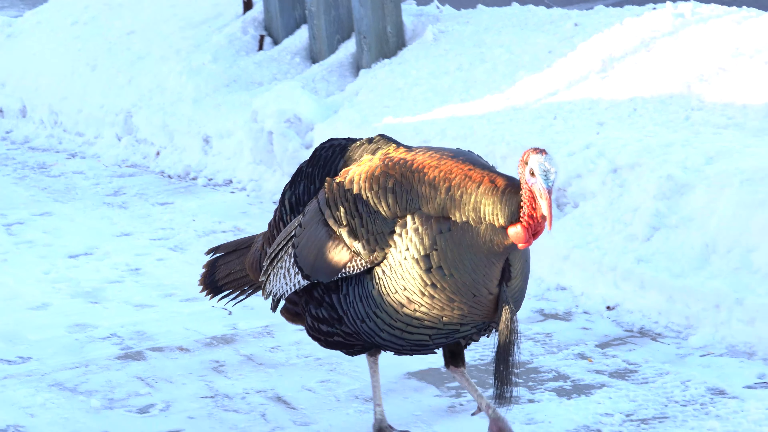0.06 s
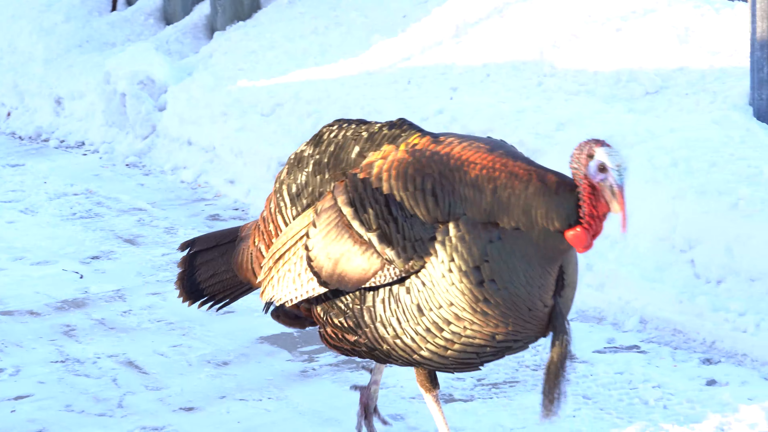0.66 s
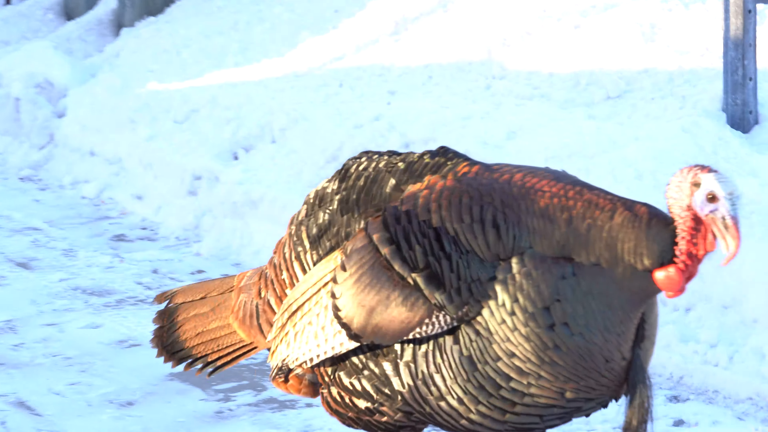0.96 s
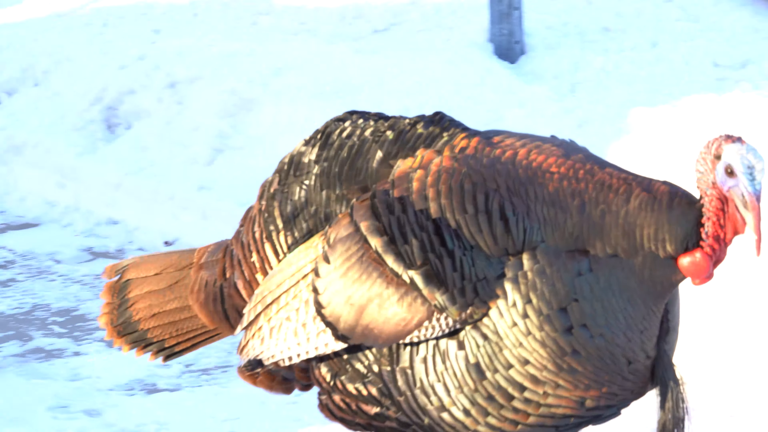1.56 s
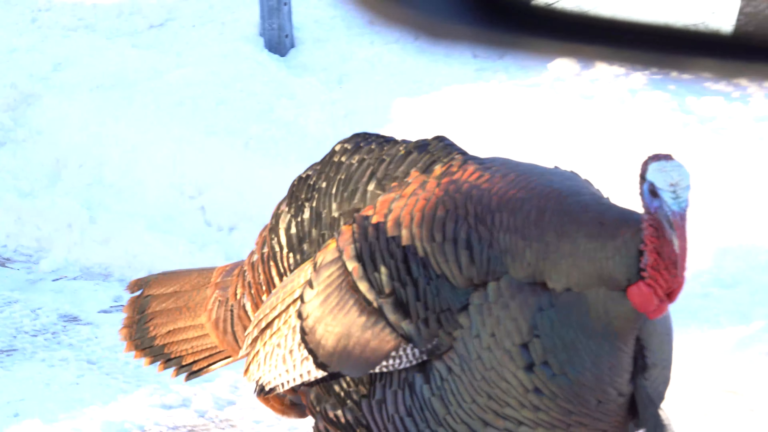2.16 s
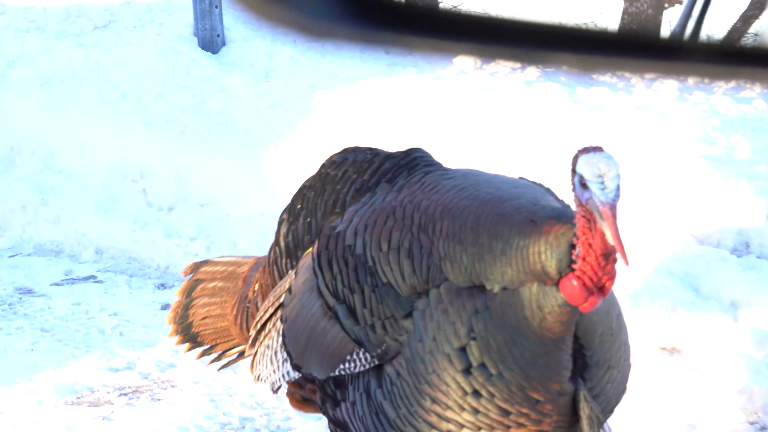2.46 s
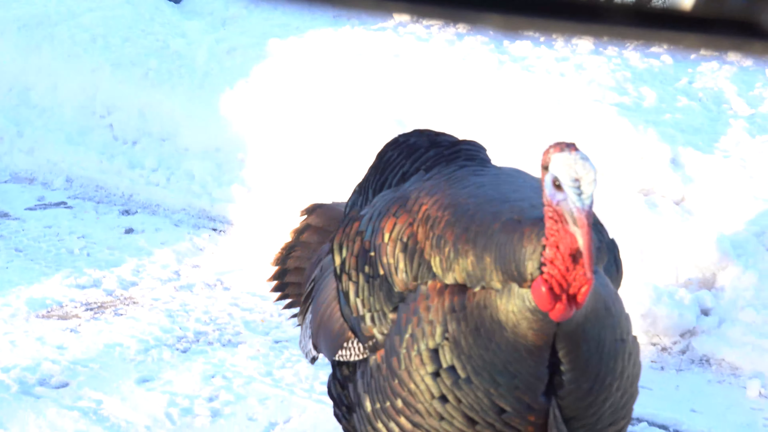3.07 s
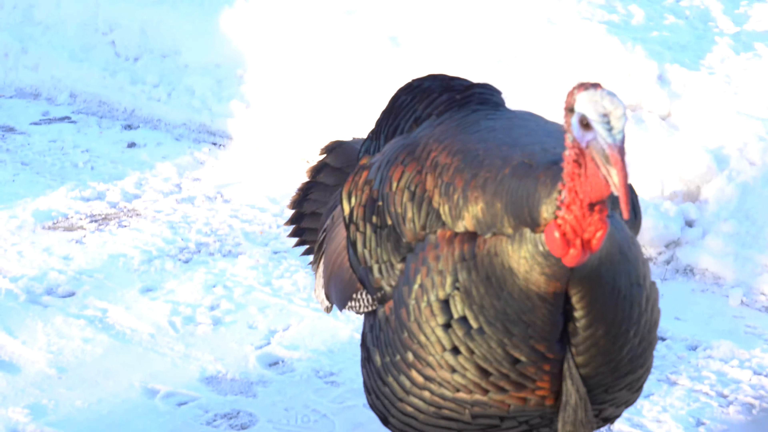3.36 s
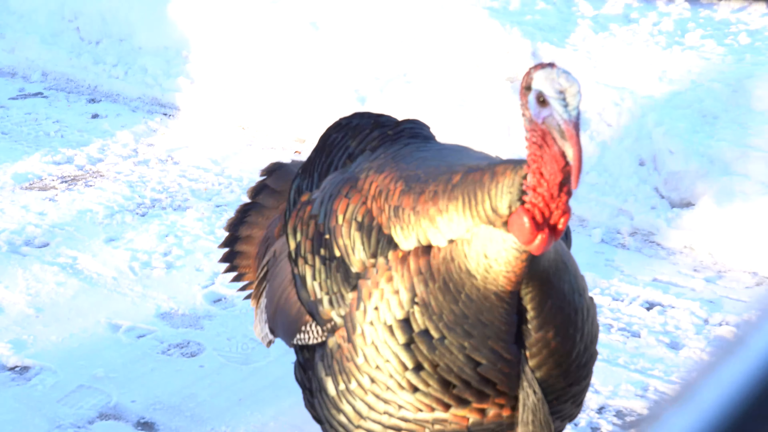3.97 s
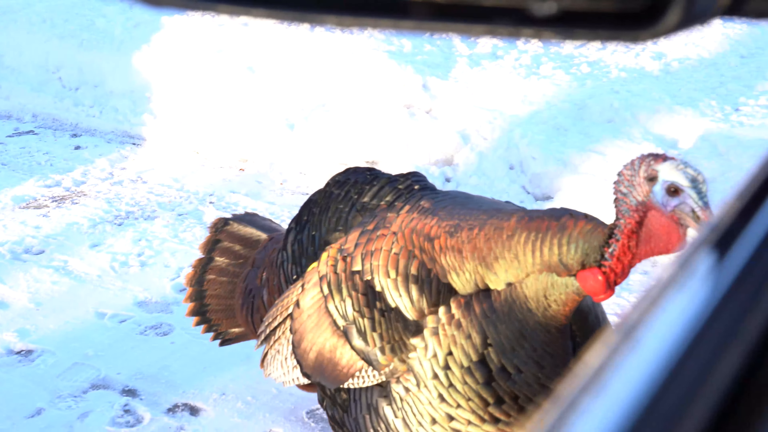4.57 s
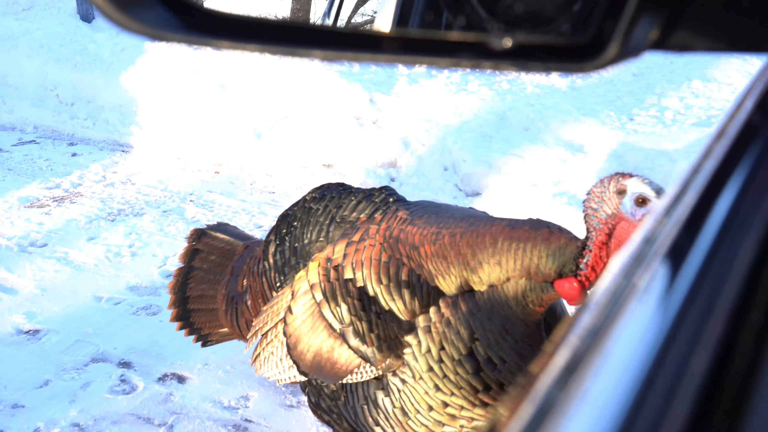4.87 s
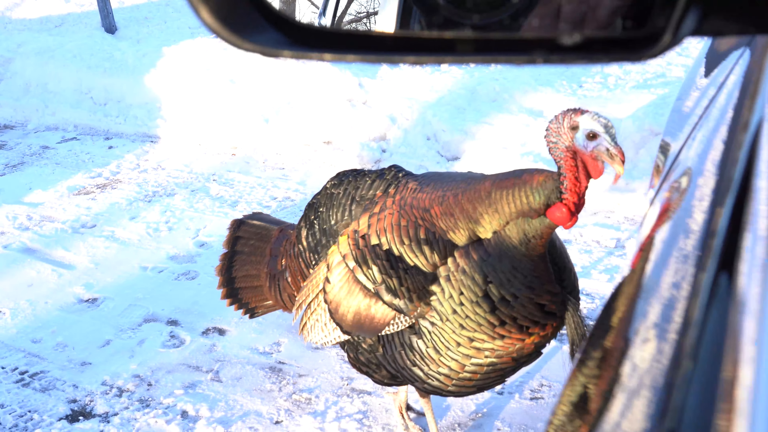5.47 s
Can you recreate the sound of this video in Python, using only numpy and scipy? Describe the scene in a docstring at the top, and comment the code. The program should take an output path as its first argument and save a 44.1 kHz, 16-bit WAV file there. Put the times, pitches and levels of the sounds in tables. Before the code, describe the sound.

A wild turkey calls close by outdoors, near the centre and slightly to the right, with hardly any echo. A brief scrap of gobble sounds right at the start. From about 0.6 to 1.1 seconds comes a faint, thin, quavering whine that ends in a small crack. Two rattling gobbles follow, at 1.4 to 1.8 and 2.3 to 2.8 seconds, each opening with quick yodelled notes and then flipping rapidly between rough barks and clear, higher tones. A second whine, from 3.2 to 3.7 seconds, arches, swells and breaks downward. The longest gobble runs from about 4.2 to 4.9 seconds. A few faint, dry ticks fall between 5.1 and 5.4 seconds, then a last gobble begins and is cut off around 5.6. Well beneath the bird throughout are a soft outdoor rush, a gently swelling hiss and a very faint low hum.

```python
"""A snowy drive, with a wild turkey close by: five rattling gobbles and two thin, quavering whines.
Most calls open with a few yodelled notes. In a gobble the bird's voice box (the syrinx) breaks about
23 times a second from a low bark up into a clear tone. A whine arches, swells and ends in a falling
crack. Windpipe, throat and mouth colour the voice, and snow banks scatter a little of it back.
Behind the bird are a soft outdoor rush, a swelling hiss, a low hum and faint ticks."""
import sys
import numpy as np
from scipy import signal
from scipy.fft import rfft, irfft, next_fast_len
from scipy.io import wavfile
from scipy.ndimage import uniform_filter1d, map_coordinates

SR = 44100
rng = np.random.default_rng(int(sys.argv[2]) if len(sys.argv) > 2 else 0)


def inscribe(sig):
    """Save sig as 16-bit PCM at rate SR to the path in sys.argv[1].

    A 1-D sig is mono; a 2-D sig holds one channel per row.
    Samples are clipped to [-1, 1] before scaling.
    """
    pcm = np.round(np.clip(np.atleast_2d(sig).T, -1, 1) * 32767)
    wavfile.write(sys.argv[1], SR, pcm.astype(np.int16))


N = 248283

# The tone colour of the rush. Each row: frequency in Hz, relative level in dB.
RUSH_COLOUR = [(15, -60), (25, -35), (38, -41), (69, -28), (107, -16), (145, -17.5), (210, -12.5),
               (370, -11), (480, -6.5), (791, 1), (1360, -4.5), (1590, -4.5), (2150, -12), (3870, -25),
               (4500, -33), (5850, -53), (9900, -120)]
# How alike left and right are in the rush. Each row: frequency in Hz, likeness from 0 to 1.
RUSH_LIKENESS = [(60, 0.99), (150, 1), (380, 0.92), (950, 0.55), (2380, 0.01), (5980, 0.01), (15000, 0.06)]
# The tone colour of the hiss. Each row: frequency in Hz, relative level in dB.
HISS_COLOUR = [(1470, -19), (2500, -2.5), (2740, -3.5), (3870, -3), (4870, -1.5), (10200, -5),
               (14700, -8.5), (15600, -9)]
# How the hiss swells and sinks. Each row: time in seconds, relative level in dB.
HISS_SWELL = [(0.02, -58.5), (0.32, -57.5), (0.55, -49.5), (0.69, -51.5), (0.78, -59), (1.41, -47.5),
              (1.97, -53), (2.47, -52.5), (2.62, -59.5), (3.01, -51), (3.48, -53), (3.7, -48), (4.07, -56),
              (4.92, -48.5), (5.01, -51.5), (5.43, -52.5), (5.57, -45), (5.62, -46.5)]
# The tones in the hum. Each row: frequency in Hz, relative level in dB.
HUM_TONES = [(48.4, -82), (107.7, -75), (124.7, -83), (171.6, -71.5), (215.3, -89)]
# How the hum grows louder late on. Each row: time in seconds, level change in dB.
HUM_SWELL = [(0, -1), (2.7, -1), (3.4, -2), (4.1, 3), (5.6, 1)]

# The syllables of the gobbles. Each row: time of the bark in seconds, relative levels in dB of the
# bark, the break and the clear tone, then the pitch of that tone in Hz.
GOBBLE_SYLLABLES = [(0.0296, -18, -23, -27, 1280), (0.078, -17, -29, -27, 1285),
                    (1.49, -14.5, -12.5, -22, 1350), (1.531, -13.5, -13, -15, 1367),
                    (1.5707, -12.5, -10, -9, 1368), (1.6133, -13, -11, -9.5, 1360),
                    (1.6567, -14, -20.5, -13.5, 1380), (1.6993, -14, -7.5, -18, 1393),
                    (1.7424, -12.5, -5, -15, 1350), (1.788, -14.5, -13.5, -20.5, 1385),
                    (2.3929, -11, -27, -11.5, 1296), (2.4375, -9, -24, -22, 1426),
                    (2.479, -7.5, -18, -20.5, 1480), (2.5231, -10, -15, -23.5, 1440),
                    (2.5639, -9.5, -17, -21, 1510), (2.607, -11.5, -12.5, -21, 1457),
                    (2.6491, -11.5, -15.5, -19, 1497), (2.6919, -10.5, -14, -17.5, 1444),
                    (2.7371, -8.5, -13.5, -17, 1460), (2.7811, -10.5, -18, -16, 1457),
                    (4.2643, -10, -22, -21, 1330), (4.307, -12, -18.5, -17.5, 1420),
                    (4.3477, -10, -18.5, -14.5, 1400), (4.3898, -10, -17.5, -19, 1405),
                    (4.4316, -12.5, -19, -18, 1386), (4.4741, -12, -23, -20.5, 1417),
                    (4.517, -9.5, -22, -18.5, 1400), (4.5606, -13, -25, -23, 1383),
                    (4.604, -10, -27, -20, 1410), (4.6483, -10.5, -20.5, -17, 1434),
                    (4.6938, -10.5, -21, -17.5, 1436), (4.739, -9.5, -20, -16.5, 1436),
                    (4.783, -10, -23, -16, 1440), (4.8306, -11, -28, -20.5, 1320),
                    (5.4675, -9, -29, -11, 1320), (5.5125, -9.5, -9.5, -17.5, 1350),
                    (5.5593, -10.5, -21, -17, 1386), (5.6, -9, -15, -17.5, 1383)]
# How throat and beak are set in a gobble. Each row: time in seconds, throat resonance in Hz, relative
# levels in dB of the mouth and the beak ring, pitch of the ring in Hz, its waver in radians.
THROAT_SETTINGS = [(0.05, 1280, -12.5, -22, 3505, 0.49), (1.5, 1446, -7, -28, 3760, .4),
                   (1.79, 1300, -16.5, -25, 3560, 0.39), (2.39, 1373, -10.5, -36, 3880, .9),
                   (2.56, 1340, -12, -27, 3720, 0.61), (2.78, 1240, -15.5, -27, 3460, 0.48),
                   (4.26, 1170, -14, -43, 3760, .8), (4.47, 1113, -20.5, -36.5, 3620, 1.4),
                   (4.6, 1140, -27, -29.5, 3290, 1.5), (4.83, 1140, -21.5, -28.5, 2950, 1.2),
                   (5.47, 1270, -19, -39, 3300, 1.2), (5.6, 1256, -19, -36, 3900, 1.1)]
# The yodelled notes that open a call. Each row: start and length in seconds, start and end of the
# glide in Hz (before it is bent), relative level in dB, mouth resonance in dB.
YODEL_NOTES = [(0.598, 0.02, 1354, 1330, -38.5, -18), (0.613, 0.042, 980, 1005, -31.5, -9.5),
               (1.385, 0.024, 970, 1077, -27.5, -6), (1.415, 0.03, 1166, 792, -30.5, -10),
               (1.449, 0.013, 1310, 1320, -27.5, -18), (2.287, .023, 1203, 930, -24.5, -23),
               (2.311, 0.029, 1148, 930, -27, -25), (2.345, 0.0078, 1120, 1480, -21, -18),
               (2.357, 0.017, 1510, 1220, -32.5, -18), (3.175, 0.015, 1380, 1480, -36.5, -13),
               (3.195, 0.013, 1435, 1226, -27.5, 3.5), (3.208, 0.013, 996, 862, -25.5, 3.5),
               (3.224, .015, 980, 1100, -31.5, -10), (4.154, 0.025, 1032, 1074, -22.5, -17.5),
               (4.177, 0.014, 1440, 1305, -19, -24), (4.193, 0.03, 997, 830, -26.5, -8),
               (4.22, 0.0192, 1340, 1450, -20, -22), (5.388, 0.014, 1270, 1123, -24, -21),
               (5.403, 0.014, 1084, 905, -19, -15), (5.419, 0.008, 1180, 1450, -13.5, -30),
               (5.423, 0.017, 1440, 1310, -31, -18)]
# Held stretches of whining. Each row: start and length in seconds, top of the arch in Hz, final sag as
# a share of the pitch, relative level at start and end in dB, mouth resonance at start and end in dB,
# high overtones in dB, jitter as a share of the pitch, throb depth in dB, quaver delay in seconds.
WHINE_STRETCHES = [(0.727, 0.13, 1007, .025, -35, -33, -15.5, -13, -22, 0.026, 3, 0.00036),
                   (0.864, .192, 1032, 0.078, -31, -27.5, -14.5, -8.5, -22.5, .018, 2.5, 0.0117),
                   (1.047, 0.06, 922, 0.092, -28, -25, -1, 5, -35, 0.0063, 0.5, 0.0027),
                   (3.317, 0.3546, 1032, .115, -31.5, -16.5, -13, 1.5, -42, 0.0085, 3.5, .022)]
# The cracks that end the whines. Each row: start and length in seconds, start and end pitch in Hz,
# relative level in dB, mouth resonance in dB.
VOICE_CRACKS = [(1.107, 0.029, 822, 716, -28, -3.5), (3.671, .037, 862, 340, -17.5, -24)]
# The tone colour of the rasp of air in the calls. Each row: frequency in Hz, relative level in dB.
BREATH_COLOUR = [(300, -77), (700, 15.5), (2000, 7.5), (3000, -13), (4200, -11.5), (5000, -11.5),
                 (8000, -13), (15000, -42)]
# A small open beak gives out almost no bass. Each row: frequency in Hz, level change in dB.
BEAK_BASS_CUT = [(200, -32), (340, -13), (455, -0.5)]
# Where the head points. Each row: time in seconds, left level minus right level in dB, head start of
# the left side in microseconds (below zero, the right side is first).
HEAD_DIRECTION = [(0, -2, -57), (.9, -2, -103), (1.65, -0.4, -64), (2.6, -1.5, -45), (3.5, 1.5, -52),
                  (4.3, -1.5, -67), (4.7, 0.4, -78), (5.5, -1.3, -78)]

# The faint ticks. Each row: start in seconds, relative level in dB.
TICK_EVENTS = [(2.0624, -42), (5.1455, -19.5), (5.2106, -25), (5.306, -23.5), (5.3805, -20.5)]
# The tone colour of the ticks. Each row: frequency in Hz, level change in dB.
TICK_COLOUR = [(800, -6), (3000, 5), (15000, -11)]


def amp(db):
    """Turn decibels into a number to multiply a sound by."""
    return 10 ** (np.asarray(db) / 20)


def unit(x):
    """Scale a sound to an average (rms) strength of 1."""
    return x / np.sqrt(np.mean(x ** 2) + 1e-20)


def along(points, hz):
    """Read between (Hz, value) points, with the octaves evenly spaced."""
    freqs, values = np.transpose(points)
    return np.interp(np.log(hz + 1), np.log(freqs + 1), values)


def curves(rows, t):
    """Read each column after the first (the time) at the times t."""
    times, *columns = np.transpose(rows)
    return [np.interp(t, np.sort(times), column) for column in columns]


def span(start, end):
    """The time of each sample from start to end, in seconds."""
    return np.arange(max(0, round(start * SR)), round(end * SR)) / SR


def wobble(t, rate):
    """A smooth curve through `rate` random values a second."""
    steps = (t - t[0]) * rate
    return map_coordinates(rng.standard_normal(int(steps[-1]) + 4), [steps + 1], mode="nearest")


def fade(t, in_s, out_s):
    """Fade in smoothly, hold, then fade out."""
    ramp = np.minimum((t - t[0]) / in_s, (t[-1] - t) / out_s)
    return np.sin(np.pi / 2 * np.clip(ramp, 0, 1)) ** 2


def add(track, t, sound):
    """Mix a sound into the track, starting at the first time in t."""
    part = track[round(t[0] * SR):][:len(sound)]
    part += sound[:len(part)]


def filtered(x, response):
    """Multiply each frequency in x by response(hz)."""
    size = next_fast_len(N + 8192)
    return irfft(rfft(x, size) * response(np.fft.rfftfreq(size, 1 / SR)), size)[..., :N]


def coloured(x, colour):
    """Turn frequencies up or down by a table of (Hz, dB) points."""
    return filtered(x, lambda hz: amp(along(colour, hz)))


def rush(t, level_db=-40.5):
    """A soft, distant rush: left and right share the bass but differ in the treble."""
    def response(hz):
        spread = np.arccos(along(RUSH_LIKENESS, hz)) / 2
        return amp(along(RUSH_COLOUR, hz)) * [np.cos(spread), np.sin(spread)]

    mid, side = filtered(rng.standard_normal((2, N)), response)
    return unit(np.array([mid + side, mid - side])) * amp(level_db + 1.1 * wobble(t, rate=14))


def hiss(t, shared_power=0.057, boost_db=4):
    """A wide hiss that swells and sinks, a touch louder on the left."""
    white = rng.standard_normal((2, N)) + np.sqrt(shared_power) * rng.standard_normal(N)
    noise = unit(coloured(white, HISS_COLOUR)) * amp([[0.3], [-0.3]])
    return noise * amp(curves(HISS_SWELL, t)[0] + boost_db + 1.08 * wobble(t, rate=46))


def hum(t):
    """A few low tones, each drifting in level and pitch."""
    tones = np.zeros(N)
    for hz, db in HUM_TONES:
        level = np.sqrt(2) * amp(db + 4.5 * wobble(t, rate=3.3))
        tones += level * np.sin(2 * np.pi * hz * t + 0.28 * wobble(t, rate=2.85))
    return tones * amp(curves(HUM_SWELL, t)[0])


def peak(x, centre, width):
    """A steep-sided bump of height 1."""
    return 1 / (1 + ((x - centre) / width) ** 2) ** 2


def airway(hz, throat_hz, mouth_db, top_db, top_hz):
    """The airway favours four bands (resonances): windpipe, throat, mouth and a high one on top."""
    windpipe = amp(-6.5) * peak(hz, centre=739, width=223)
    throat = peak(hz, throat_hz, width=342)
    mouth = amp(mouth_db) * peak(hz, centre=2055, width=304)
    top = amp(top_db) * peak(hz, top_hz, width=440)
    return np.sqrt(windpipe ** 2 + throat ** 2 + mouth ** 2 + top ** 2)


def voice(pitch, throat_hz, mouth_db, top_db, odd=1, top_hz=3600):
    """Ten harmonics of the syrinx pass through the airway; without the odd ones it is an octave up."""
    harmonic = np.arange(1, 11)[:, None]
    hz = harmonic * pitch
    phase = 2 * np.pi * (np.cumsum(pitch) / SR + rng.random())
    gain = airway(hz, throat_hz, mouth_db, top_db, top_hz) * np.where(harmonic % 2, odd, 1)
    lag = np.arctan((hz - throat_hz) / 350)  # the throat rings after each pulse
    strength = np.sqrt(np.sum(gain ** 2, axis=0) / 2)
    return np.sum(gain * np.sin(harmonic * phase - lag), axis=0) / strength


def gobble_syllable(at, bark_db, break_db, tone_db, tone_hz, bark_hz=599, shimmer_db=2):
    """The pitch slides down into a rough bark; rising again, the syrinx flips up an octave, clear."""
    gaps = [at - start - length for start, length, *_ in YODEL_NOTES if start < at]
    since_yodel = min(gaps, default=np.inf)
    # just after a yodel the bark is longer and the slide between barks is louder
    hold_s = 0.0012 + 0.021 * np.exp(-since_yodel / 0.022)
    slide_db = -42.5 + 20 * np.exp(-since_yodel / 0.086)
    throat_hz, mouth_db, beak_db, beak_hz, beak_waver = curves(THROAT_SETTINGS, at)
    bark_start, bark_end = at - hold_s / 2, at + hold_s / 2
    half_hz = tone_hz / 2  # heard as tone_hz once the odd harmonics drop out
    # Each row: time in seconds, pitch in Hz, level in dB, odd harmonics and roughness from 0 to 1.
    shape = [(bark_start - 0.023, 1060, slide_db - 22, 1, 0.1),
             (bark_start - 0.018, 970, slide_db, 1, 0.1),
             (bark_start - 0.011, 800, slide_db, 1, 0.3),
             (bark_start - 0.0055, bark_hz * 1.05, bark_db - 14, 1, 0.8),
             (bark_start, bark_hz * 0.8073, bark_db - 4.5, 1, 1),
             (bark_end + 0.0023, bark_hz * 1.154, bark_db - 3, 0.8, 1),
             (bark_end + 0.0036, half_hz, break_db, 0.2, 0.3),
             (bark_end + 0.0083, half_hz, tone_db, 0.02, 0.1),
             (bark_end + 0.01705, half_hz * 0.969, tone_db - 11.5, 0.02, 0.1),
             (bark_end + 0.021, half_hz * 0.85, slide_db - 4.5, 0.02, 0.1),
             (bark_end + 0.04, half_hz * 0.85, slide_db - 6, 0.02, 0.1)]
    t = span(shape[0][0], shape[-1][0])
    pitch, db, odd, rough = uniform_filter1d(np.array(curves(shape, t)), size=70, axis=1)
    pitch = pitch * np.exp(0.05 * rough * wobble(t, rate=700))
    tone = voice(pitch, throat_hz, mouth_db + 9 * rough - 11, beak_db + 10 * rough - 11, odd, beak_hz)
    # the sharpest pulses of the bark set off a short, high ring in the beak
    waver = beak_waver * wobble(t, rate=1300)
    ring = np.sin(2 * np.pi * beak_hz * t + waver) * peak(t, centre=at + 0.003, width=0.0053)
    level = amp(db + shimmer_db * rough * np.tanh(wobble(t, rate=564)))
    return t, level * tone + amp(bark_db + beak_db + 5.5) * ring


def yodel(start, length, start_hz, end_hz, level_db, mouth_db, flip_hz=1125, overlap_s=0.0036):
    """A short, clear glide. Both ends bend towards the pitch where the voice flips register."""
    t = span(start - overlap_s, start + length + overlap_s)
    glide = np.geomspace(start_hz, end_hz, len(t))
    bend = 0.37 * np.linspace(-1, 1, len(t)) ** 4
    pitch = (glide + bend * (flip_hz - glide)) * np.exp(0.004 * wobble(t, rate=430))
    level = amp(level_db + 2.4 * wobble(t, rate=227)) * fade(t, in_s=0.01, out_s=0.0085)
    return t, level * voice(pitch, throat_hz=1110, mouth_db=mouth_db, top_db=-45)


def whine(start, length, crest_hz, sag, start_db, end_db, start_mouth_db, end_mouth_db, top_db,
          jitter, throb_db, quaver_lag, quaver_hz=41.15, crest_at=0.4, calm_s=0.033):
    """A held note that arches and swells, with a fast quaver that calms at the end."""
    t = span(start, start + length)
    progress = np.linspace(0, 1, len(t))
    climb_left = np.clip(1 - progress / crest_at, 0, 1)
    past_crest = np.clip((progress - crest_at) / (1 - crest_at), 0, 1)
    arch = 1 - 0.0331 * climb_left ** 2 - sag * past_crest ** 2.3
    beat = np.pi * quaver_hz * (t - start - quaver_lag)
    unrest = np.clip((t[-1] - t) / calm_s, 0, 1)
    quaver = 0.096 * unrest * (np.abs(np.cos(beat)) - 2 / np.pi)  # round tops, sharp dips
    pitch = crest_hz * arch * np.exp(quaver + jitter * wobble(t, rate=700))
    effort = progress ** 1.67  # the note swells late, and the mouth opens as it does
    throb = throb_db * unrest * np.cos(2 * beat + 1.93) + wobble(t, rate=56.4)
    db = start_db + (end_db - start_db) * effort + throb + 0.15 * wobble(t, rate=630)
    mouth_db = start_mouth_db + (end_mouth_db - start_mouth_db) * effort + throb
    tone = voice(pitch, throat_hz=1268, mouth_db=mouth_db, top_db=top_db, top_hz=3360)
    return t, amp(db) * fade(t, in_s=0.0031, out_s=0.008) * tone


def crack(start, length, start_hz, end_hz, level_db, mouth_db, jitter=0.044, rasp_db=3, overlap_s=0.003):
    """The voice gives way: it dives and turns rough."""
    t = span(start - overlap_s, start + length + overlap_s)
    pitch = np.geomspace(start_hz, end_hz, len(t)) * np.exp(jitter * wobble(t, rate=400))
    level = amp(level_db + rasp_db * np.tanh(wobble(t, rate=482))) * fade(t, in_s=0.011, out_s=0.018)
    return t, level * voice(pitch, throat_hz=1320, mouth_db=mouth_db, top_db=-34, top_hz=3340)


def turkey(breath_db=-17.5):
    """All the calls leave the beak with a little rasp of air that follows their strength."""
    calls = np.zeros(N)
    for note, rows in ((gobble_syllable, GOBBLE_SYLLABLES), (yodel, YODEL_NOTES),
                       (whine, WHINE_STRETCHES), (crack, VOICE_CRACKS)):
        for row in rows:
            add(calls, *note(*row))
    breath = coloured(calls * rng.standard_normal(N), BREATH_COLOUR)
    return coloured(calls + amp(breath_db) * breath, BEAK_BASS_CUT)


def direct_sound(bird):
    """The bird stands a little to the right, so that side hears it sooner."""
    samples = np.arange(N)
    balance_db, lead_us = curves(HEAD_DIRECTION, samples / SR)
    shift = lead_us * SR / 1e6
    return np.array([amp(side * balance_db / 2) * map_coordinates(bird, [samples + side * shift / 2])
                     for side in (1, -1)])  # left, then right


def snow_scatter(bird, decay_s=0.24, level_db=-23):
    """Snow banks send back only a short, weak scatter of echoes."""
    t = np.arange(SR // 2) / SR
    build_up = 1 - np.exp(-t / 0.0021)
    echoes = rng.standard_normal((2, len(t))) * amp(-60 * t / decay_s) * build_up
    echoes /= np.linalg.norm(echoes[0])
    return amp(level_db) * signal.fftconvolve(bird[None], echoes, axes=1)[:, :N]


def ticks(decay_s=0.014, trim_db=-9):
    """Tiny dry clicks, each a burst of noise that dies at once."""
    clicks = np.zeros((2, N))
    t = np.arange(SR // 20) / SR
    for start, db in TICK_EVENTS:
        for channel in clicks:
            add(channel, start + t, amp(db + trim_db - 60 * t / decay_s) * rng.standard_normal(len(t)))
    return coloured(clicks, TICK_COLOUR)


def scene():
    """Mix the bird, its echoes and the surroundings in stereo."""
    t = np.arange(N) / SR
    bird = turkey()
    return direct_sound(bird) + snow_scatter(bird) + rush(t) + hiss(t) + hum(t) + ticks()


def record(dry):
    """Cut away the very highest treble."""
    return filtered(dry, lambda hz: hz < 15780)


dry = scene()
out = record(dry)
inscribe(out)
```